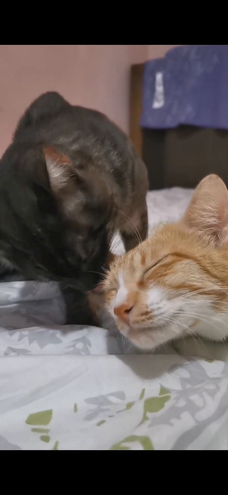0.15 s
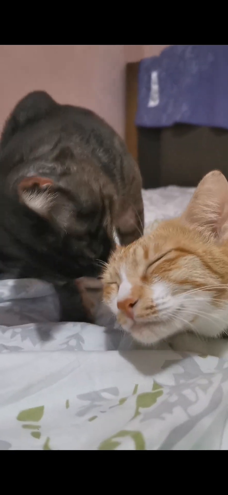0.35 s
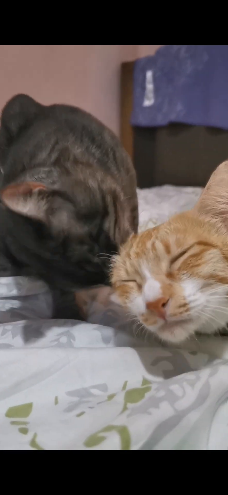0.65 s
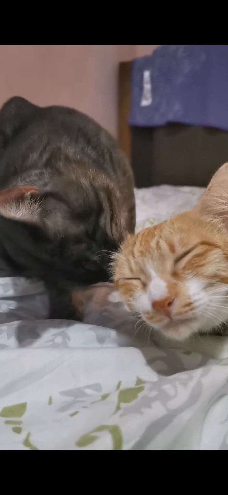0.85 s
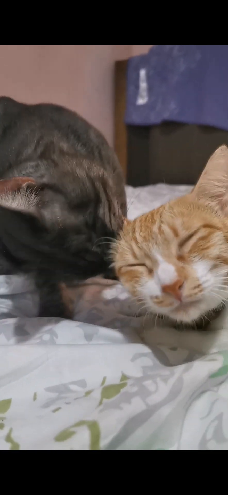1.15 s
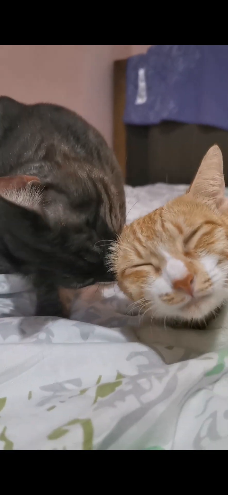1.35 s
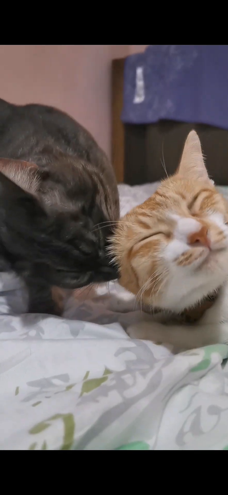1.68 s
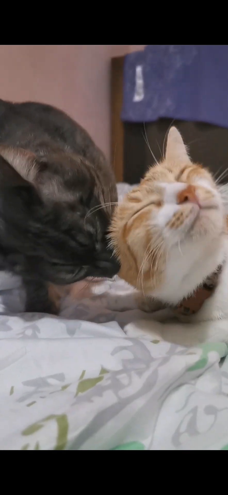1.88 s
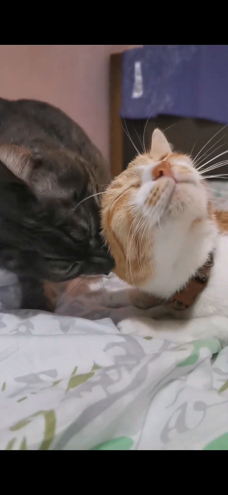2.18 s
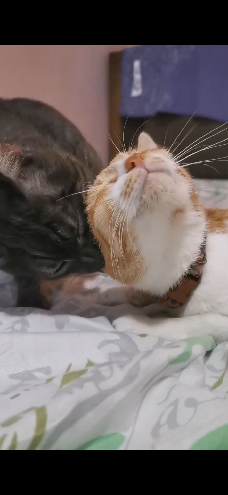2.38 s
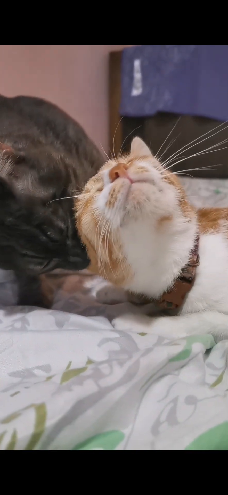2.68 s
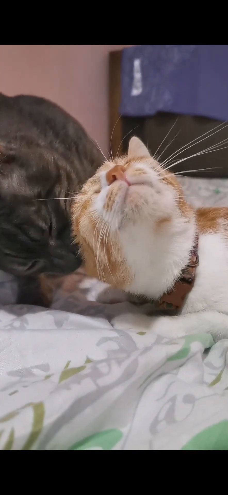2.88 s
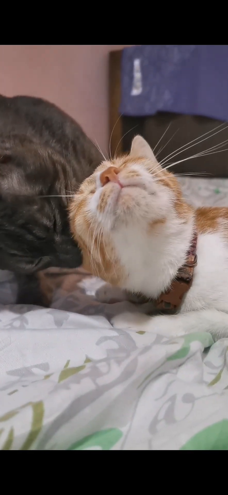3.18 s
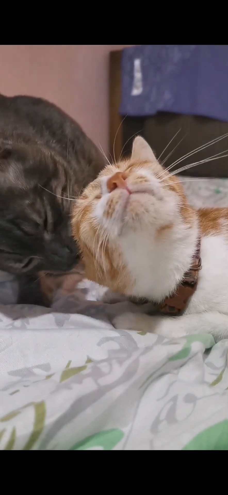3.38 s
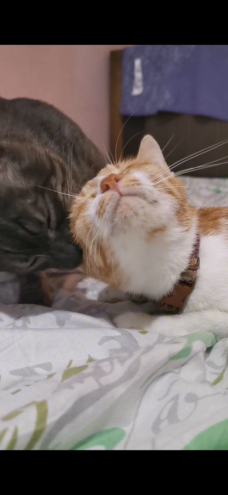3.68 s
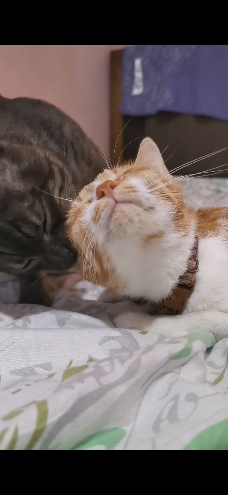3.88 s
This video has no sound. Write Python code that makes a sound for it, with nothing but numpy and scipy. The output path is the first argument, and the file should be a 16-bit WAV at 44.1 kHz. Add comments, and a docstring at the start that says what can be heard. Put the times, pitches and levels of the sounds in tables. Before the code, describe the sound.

Very close contact sound from cats grooming on a bed: light rubs and a soft bump, then three long, harsh rasping strokes with bright hair crackle. Afterwards only tiny prickly ticks and faint rustles fade out. Nearly everything is on the right; the left holds faint rumble and hiss.

```python
"""On a bed with a cat, bedding or fur rubs the right microphone port: rasping strokes, snapping hairs and soft
pushes reach it by contact, loud and dry, made from random catches, noise and damped rings. The almost shut
left port has its own rumble and hiss, a trace of airborne rasp, a faint two-partial mew, a short noise snort
and a tap on the case."""
import sys
import numpy as np
from scipy import signal
from scipy.fft import rfft, irfft
from scipy.io import wavfile
from scipy.ndimage import uniform_filter1d, map_coordinates

SR = 44100
rng = np.random.default_rng(int(sys.argv[2]) if len(sys.argv) > 2 else 0)


def store_pcm(level_fs):
    """Save levels as 16-bit WAV."""
    pcm = np.round(np.clip(level_fs, -1, 1) * 32767).astype(np.int16)
    wavfile.write(sys.argv[1], SR, np.atleast_2d(pcm).T)


def elevation(decibels):
    """Turn decibel levels (scalar or array-like) into linear amplitude ratios."""
    levels = np.asarray(decibels, float)
    return 10 ** (levels / 20)


N = 177754

# Colours of a stroke: (frequency [Hz], relative density [dB per Hz])
# Mid rasp of the rubbing
RASP_COLOUR = [(600, -26.5), (1000, -3.5), (1500, 0), (1850, -1), (2250, 2), (2800, -1), (3400, -5.5),
               (4200, -28), (6000, -17.5)]
# Bright sizzle of hairs
SIZZLE_COLOUR = [(2500, -20), (3600, -5), (5200, 2.34), (7500, -8.5), (11000, -9), (16000, -13)]
# Harsh scrape at full contact
SCRAPE_COLOUR = [(2600, -26.5), (3500, -2.5), (4500, 5), (6000, -1), (7500, -23)]
# Dull pressure on the port
PRESS_COLOUR = [(130, -8), (250, -1), (420, 1.5), (700, 2), (1000, -3), (1700, -9.5), (2700, -16),
                (4000, -48)]
# Low push against the port
PUSH_COLOUR = [(20, -39), (45, -5), (110, 4), (200, 1), (400, -8.5)]


def strokes(rasp_db, sizzle_db, press_db, push_db):
    """Rubbing catches drive four ranges and plain noise the low push; one shared stutter breaks up the stroke."""
    fine = catches(rasp_db, slow_rate=500.0, per_db=2.16, spread_db=3.0, smooth=0.5)
    coarse = catches(rasp_db, slow_rate=250.0, per_db=0.27, spread_db=-0.5, smooth=0.74)
    mixed = 0.93 * fine + 0.51 * coarse

    sizzle_gain = elevation(sizzle_db - 2.5 + 0.37 * wobble(39.73))
    sizzle = sizzle_gain * patchy(coloured(fine, SIZZLE_COLOUR), depth_db=1.0)
    rasp = elevation(rasp_db + 0.47) * patchy(coloured(mixed, RASP_COLOUR), depth_db=0.66)
    press_gain = elevation(press_db - 0.33 + 0.3 * wobble(30.53))
    press = press_gain * patchy(coloured(coarse, PRESS_COLOUR), depth_db=1.0)
    push_gain = elevation(push_db - 0.5 + 1.35 * wobble(28.91))
    push = push_gain * coloured(noise(), PUSH_COLOUR)

    # Scrape grows faster than the rasp: 1.33 dB per dB, from its level in a full stroke
    full_stroke_db, scrape_db, scrape_growth = -33, -42, 1.33
    scrape_gain = elevation(scrape_db + scrape_growth * (rasp_db - full_stroke_db))
    scrape = scrape_gain * patchy(coloured(fine, SCRAPE_COLOUR), depth_db=4.5)

    stutter_db = 0.37 * wobble(45.4) + 0.87 * wobble(120)
    return elevation(stutter_db) * (scrape + sizzle + rasp + press + push)


def catches(effort_db, slow_rate, per_db, spread_db, smooth):
    """Rubbing surfaces catch and let go as random clicks whose rate follows effort, over smooth sliding noise."""
    light_touch_db = -59.5  # here the base rate is slow_rate [catches/s]
    chance = slow_rate * elevation(per_db * (effort_db - light_touch_db)) / SR
    chance = np.clip(chance, 1e-4, 1)
    caught = rng.random(N) < chance * elevation(5 * wobble(60))
    size_db = spread_db * np.minimum(rng.exponential(size=N), 5)
    direction = np.sign(rng.random(N) - 0.4)  # more pull than push
    sizes = elevation(size_db) * direction
    # Level stays even as the catches get denser
    clicks = caught * sizes / np.sqrt(chance * np.mean(sizes ** 2))
    return np.sqrt(1 - smooth) * clicks + np.sqrt(smooth) * noise()


# Three long rasping strokes, a curve each: (time [s], relative rasp level [dB], sizzle over rasp [dB])
STROKE_CURVES = [
    [(.72, -62, 8), (.775, -47.5, -1.2), (.83, -41, -0.3), (.9, -33, -1), (1.04, -33.5, 0.7),
     (1.17, -33, -1), (1.2, -37, -1), (1.26, -62, 6.5)],
    [(1.36, -63, 2), (1.445, -31, -2.5), (1.514, -30, 0.5), (1.575, -35.5, 5.5), (1.67, -36, 1.7),
     (1.715, -57.5, 5)],
    [(1.82, -57.5, 1.5), (1.887, -36.5, 2.8), (1.95, -33.5, 1.5), (2.06, -33.5, 2.3), (2.23, -36.5, 3.5),
     (2.31, -33.5, 2.1), (2.38, -38.5, 4.5), (2.45, -42, 1), (2.49, -75.5, 11)],
]
# Short light rubs: (peak time [s], width [s], relative rasp level [dB], sizzle over rasp [dB])
LIGHT_RUBS = [(.275, 0.044, -49, -3), (0.376, 0.13, -50.5, -3.5), (0.479, 0.15, -51, -0.5),
              (.625, 0.066, -52.5, -2), (.73, 0.067, -58, 1), (1.295, 0.07, -54.5, 0.7),
              (1.792, .08, -56, -4), (2.68, 0.21, -61, -0.5), (2.806, 0.088, -58, -4),
              (2.97, 0.046, -64, -1), (3.078, 0.077, -62.5, -3), (3.418, 0.041, -70, -5),
              (3.48, .07, -70, 3), (3.555, .08, -67.5, 12), (3.622, 0.051, -60, -4), (3.713, 0.049, -61, 8),
              (3.809, 0.03, -69, 11.5), (3.945, 0.075, -71, -9)]
# Bedding or fur resting on the port, shifting a little:
# (time [s], relative rasp level [dB], sizzle over rasp [dB], pressure over rasp [dB])
RESTING_CONTACT = [(0, -77, -13, 9.5), (.13, -77.5, -3, 12), (.17, -72.5, 1, 10.5), (.21, -60, 2.5, 1),
                   (.33, -55.5, -2.5, 4.5), (.57, -58.5, -3, 1.5), (.69, -60, 4.5, -10),
                   (1.35, -61, 0.5, -5.5), (1.75, -59.5, 4.5, 1.5), (2.49, -64, 3, -7),
                   (2.9, -64.5, 0.7, -9), (3.29, -68, -3, -8), (3.36, -69.5, 3.5, -3), (3.6, -65.5, 3, -11),
                   (4.03, -70, 3, -4)]
# Pressure on the port surges:
# (peak time [s], width [s], relative pressure level [dB], relative push level [dB])
PRESS_SURGES = [(0.211, 0.037, -51, -39.5), (.235, 0.029, -47, -58), (0.271, 0.051, -38, -61),
                (.374, 0.044, -51.5, -53.5), (.55, 0.047, -71, -65), (.79, 0.032, -44, -60),
                (.932, 0.21, -43.5, -46), (1.16, 0.026, -32.5, -37), (1.47, 0.074, -50, -46),
                (1.53, 0.12, -32.5, -42), (1.995, 0.026, -35, -37), (2.303, 0.03, -37, -38),
                (2.378, 0.023, -35, -46)]


def touch():
    """Contact as rasp, sizzle, pressure and push levels: strokes, rubs and surges over the resting contact."""
    stroke_press_db, stroke_push_db, rest_push_db, rub_press_db = -2.5, -12, -6.5, -7  # over the rasp

    long_strokes = []
    for curve in STROKE_CURVES:
        silent_before = (curve[0][0] - 0.01, -140, 0)
        silent_after = (curve[-1][0] + 0.01, -140, 0)
        long_strokes.append(curves([silent_before, *curve, silent_after]))
    rubs = [(bump(s, width_s, db), over_db) for s, width_s, db, over_db in LIGHT_RUBS]
    rest_db, rest_sizzle_db, rest_press_db = curves(RESTING_CONTACT)
    surge_press = [bump(s, width_s, press_db) for s, width_s, press_db, _ in PRESS_SURGES]
    surge_push = [bump(s, width_s, push_db) for s, width_s, _, push_db in PRESS_SURGES]

    stroke_db = summed(db for db, _ in long_strokes)
    rub_db = summed(db for db, _ in rubs)
    rasp_db = summed([stroke_db, rub_db, rest_db])
    moving_sizzle = [db + over_db for db, over_db in long_strokes + rubs]
    sizzle_db = summed(moving_sizzle + [rest_db + rest_sizzle_db])
    steady_press = [stroke_db + stroke_press_db, rub_db + rub_press_db, rest_db + rest_press_db]
    press_db = summed(steady_press + surge_press)
    push_db = summed([stroke_db + stroke_push_db, rest_db + rest_push_db] + surge_push)
    return rasp_db, sizzle_db, press_db, push_db


# The clearest hairs snapping free, soft knocks and smacks:
# (time [s], relative peak level [dB], pitch [Hz], life [cycles])
CLEAR_SNAPS = [(0.201, -56, 152, 1.3), (0.2098, -30.5, 11400, 2.7), (0.2105, -23, 4060, 0.47),
               (0.2118, -28, 165, 0.39), (0.323, -33, 7000, 1.2), (0.3405, -40, 8000, 1.1),
               (0.37, -28.5, 2020, 0.91), (0.41, -27, 2130, 0.88), (0.47, -31, 2800, 1.2),
               (0.541, -32, 3180, 0.89), (0.6179, -32, 3590, 1.6), (0.8367, -31, 3100, 0.51),
               (0.448, -25.5, 5600, 0.41), (0.4864, -33, 3060, 0.83), (0.5118, -22.5, 7900, 0.47),
               (0.531, -29.5, 7950, 1.1), (0.6267, -28, 5700, 0.76), (0.64, -27, 3100, 1.04),
               (0.7226, -31.5, 4000, 0.95), (0.7705, -22, 3670, 0.46), (0.7751, -23, 2800, 0.4),
               (1.24, -21, 4100, 0.34), (1.2794, -32, 4800, 0.83), (1.6837, -14, 2760, 0.25),
               (1.6878, -19.5, 4900, 1.6), (1.755, -39, 6600, 1.1), (1.8268, -27, 5700, 2.1),
               (2.4705, -31, 5060, 2.4), (1.3733, -30.5, 10300, 2), (1.7374, -21.5, 5070, 2.6),
               (1.7435, -22, 4620, 2.1), (1.784, -37, 1230, 4.4), (1.792, -30, 4730, 2.5),
               (1.8042, -28, 5800, 0.57), (1.8123, -28, 5100, 1.8), (1.819, -21, 5860, 0.47),
               (2.4965, -28, 2660, 0.24), (2.5603, -34, 5400, 2.8), (2.5647, -34, 5600, 1.2),
               (2.67, -32, 5700, 3.1), (2.6973, -29, 5900, 2.8), (2.785, -30, 5630, 2.1),
               (2.792, -28.5, 2200, 0.82), (2.804, -26, 4020, 1), (2.8124, -20, 5500, 2.7),
               (2.8354, -27.5, 6650, 1.7), (2.8507, -29, 5800, 1.3), (2.853, -33.5, 1660, 0.73),
               (2.9093, -37.5, 5460, 1.9), (2.975, -31.5, 5730, 0.92), (2.9857, -35, 5300, 1.6),
               (3.0256, -33.5, 3860, 0.73), (3.0853, -39, 2390, 1.2), (3.1676, -34.5, 8500, 0.53),
               (3.2185, -32.5, 4350, 0.49), (3.2366, -37.5, 7400, 0.73), (3.2951, -37, 6800, 3.7),
               (3.3131, -33, 5100, 1.2), (3.3448, -40, 1980, 1.2), (3.4027, -35, 6300, 2),
               (3.41, -34, 7140, 0.9), (3.4387, -26.5, 5200, 1.8), (3.5328, -29, 9050, 0.85),
               (3.624, -51, 347, 1.3), (3.6286, -35.5, 9200, 1.2), (3.6607, -27.5, 6060, 1.2),
               (3.6883, -37, 7800, 1.4), (3.7073, -35, 5200, 1.5), (3.711, -31, 8000, 1.1),
               (3.7227, -31, 5260, 0.61), (3.799, -33.5, 6150, 1.4), (3.8521, -40, 6140, 1.7),
               (3.878, -40.5, 8950, 1.6), (3.9645, -40, 4450, 0.92), (3.9858, -41, 5800, 1.5)]


def snaps(sizzle_db):
    """Each hair lets go abruptly and rings a few damped cycles; lesser ones prickle around the clear ones."""
    lesser = rng.random((480, 4))
    lesser_s = lesser[:, 0] * (N - 1) / SR
    local_db = np.minimum(sizzle_db[(lesser_s * SR).astype(int)], -36)
    lesser_db = local_db + 5.5 + 13 * lesser[:, 1] ** 2
    lesser_hz = 2200 * 7.2 ** lesser[:, 2]
    lesser_cycles = 0.62 + 0.79 * lesser[:, 3]
    rows = np.vstack([np.transpose([lesser_s, lesser_db, lesser_hz, lesser_cycles]), CLEAR_SNAPS])

    length = 1200
    out, t = np.zeros(N + length), np.arange(length) / SR
    for s, db, hz, cycles in rows:
        turn, sign = rng.random(2)
        onset = 1 - np.exp(-t * hz / 0.46)
        decay = np.exp(-1.6 * t * hz / max(cycles, 0.3))
        ring = onset * decay * np.sin(2 * np.pi * hz * t + 1.32 * turn) * np.sign(sign - 0.5)
        ring[75:] += 0.081 * ring[:-75]  # rebound
        start = round(s * SR)
        out[start:start + length] += elevation(db - 3.5) * ring / np.abs(ring).max()
    return out[:N]


# Soft dull brushes of fur: (peak time [s], width [s], relative level [dB])
BRUSH_SWELLS = [(2.67, 0.13, -61.5), (2.79, 0.13, -60.5), (3.06, 0.13, -59)]
# Their colour: (frequency [Hz], relative density [dB per Hz])
BRUSH_COLOUR = [(300, -35), (480, -6.5), (650, -1.5), (850, -8), (1300, -10.5), (2000, -14)]


def brushes():
    """Soft fur sweeps by: dull noise in a lumpy swell."""
    level_db = summed(bump(*row) for row in BRUSH_SWELLS) + 1.5 * wobble(60)
    return elevation(level_db) * patchy(coloured(noise(), BRUSH_COLOUR), depth_db=2.0)


# Hair tips rustling on the port: (peak time [s], width [s], relative level [dB])
RUSTLE_SWELLS = [(.45, 0.38, -59), (3.44, .08, -80), (3.6, 0.47, -61.5), (3.95, 0.19, -71.5)]
# Their colour: (frequency [Hz], relative density [dB per Hz])
RUSTLE_COLOUR = [(4500, -20), (6500, 4.5), (10000, -2.5), (16000, -4)]


def rustles():
    """Hair tips whisk lightly: many small catches make a thin, prickly hiss."""
    level_db = summed(bump(*row) for row in RUSTLE_SWELLS)
    tips = catches(level_db, slow_rate=600.0, per_db=-0.1, spread_db=4.0, smooth=0.27)
    return elevation(level_db + 1.2 * wobble(40)) * coloured(tips, RUSTLE_COLOUR)


# Response of the right port's cavity: (frequency [Hz], relative gain [dB])
PORT_RESPONSE = [(20, -3.5), (5500, -1), (6350, -1.5), (6800, 2), (7200, -0.5), (7700, -2.5), (8300, -1),
                 (9800, 1.5), (10700, 5.5), (11200, 4), (12000, -1.5), (13200, -1), (14100, -10),
                 (15000, -1.5), (16000, -4)]


def right_port():
    """Rubbing drives the port directly; its cavity colours the contact sound, over the port's own floor."""
    rasp_db, sizzle_db, press_db, push_db = touch()
    contact = strokes(rasp_db, sizzle_db, press_db, push_db) + snaps(sizzle_db) + brushes() + rustles()
    through_cavity = np.std(contact) * coloured(contact, PORT_RESPONSE)
    return elevation(6) * (through_cavity + right_floor())


# The strokes heard through the air: (peak time [s], width [s], level [dB])
AIR_SWELLS = [(.99, 0.3, -73.5), (1.53, .2, -76), (2.05, 0.38, -75), (2.32, .14, -83)]
# Their colour: (frequency [Hz], relative density [dB per Hz])
AIR_COLOUR = [(1500, -35), (2300, -8), (3000, 0), (4000, -3), (5200, -6), (6500, -11), (7600, -13),
              (9000, -6), (10200, -22), (13000, -32)]


def airborne_rasp():
    """A trace of the strokes crosses the air: faint noise in slow swells."""
    level_db = summed(bump(*row) for row in AIR_SWELLS) + 1.8 * wobble(14.6)
    return elevation(level_db) * patchy(coloured(noise(), AIR_COLOUR), depth_db=1.0)


# Glide of the mew: (time [s], pitch [Hz])
MEW_PITCH = [(.43, 765), (.54, 686), (.62, 700), (.7, 705)]
# Its swell: (peak time [s], width [s])
MEW_SWELL_SHAPE = [(.58, .2)]


def mew():
    """A thin far mew: two clean harmonic partials glide under one swell."""
    first_db, second_db = -78.5, -74  # rms at the swell's peak, before its wobble
    hz, = curves(MEW_PITCH)
    phase = 2 * np.pi * np.cumsum(hz * (1 + 0.0021 * wobble(66))) / SR
    swell = elevation(bump(*MEW_SWELL_SHAPE[0], 0) + 1.5 * wobble(25))
    partials = elevation(first_db) * np.sin(phase) + elevation(second_db) * np.sin(2 * phase)
    return np.sqrt(2) * swell * partials


# Colour of the nose: (frequency [Hz], relative density [dB per Hz])
NOSE_COLOUR = [(800, -28), (1250, -10), (1700, -5), (2400, -11), (3800, -4), (5100, 0), (6500, -2),
               (8300, -3), (9500, -25)]


def snort():
    """A short puff of noise through a cat's nose: it builds, then stops short."""
    peak_s, peak_db = 1.805, -59
    rise, fall = 560, 1298  # dB per second
    t = np.arange(N) / SR - peak_s
    level_db = peak_db + np.minimum(rise * t, -fall * t)
    return elevation(level_db + 2.5 * wobble(300)) * coloured(noise(), NOSE_COLOUR)


# A tap on the case, at the left port: (time [s], relative level [dB])
CASE_TAPS = [(0.207, -66)]


def case_tap():
    """A tap makes the case thud: noise and a 300 Hz tone, dying 60 dB in 30 ms."""
    length = 1500
    out, t = np.zeros(N), np.arange(length) / SR
    for s, db in CASE_TAPS:
        thud = 0.6 * rng.standard_normal(length) + 2.2 * np.sin(2 * np.pi * 300 * t)
        start = round(s * SR)
        out[start:start + length] += elevation(db - 60 * t / 0.03) * thud
    return out


# Rumble and hiss of the left port: (frequency [Hz], relative density [dB per Hz])
LEFT_FLOOR_COLOUR = [(20, 3), (150, 0), (300, -9.5), (600, -16), (1600, -17), (4000, -18), (6800, -27),
                     (7600, -33), (9000, -28), (10200, -32), (15000, -35), (15800, -42)]


def left_floor():
    """The left port's rumble and hiss: coloured noise with a wandering level."""
    return elevation(-74.0 + 0.59 * wobble(16)) * patchy(coloured(noise(), LEFT_FLOOR_COLOUR), depth_db=2.0)


# Rumble and hiss of the right port: (frequency [Hz], relative density [dB per Hz])
RIGHT_FLOOR_COLOUR = [(20, 3.5), (60, -6), (110, -0.5), (170, -24), (450, -27), (1000, -26), (3000, -26.5),
                      (8000, -25.5), (16000, -29)]


def right_floor():
    """The right port's rumble and hiss: coloured noise with a slowly wandering level."""
    return elevation(-68.0 + 1.1 * wobble(3.4)) * coloured(noise(), RIGHT_FLOOR_COLOUR)


def noise():
    """White noise of rms 1."""
    return rng.standard_normal(N)


def unit(x):
    """Scaled to rms 1."""
    return x / np.sqrt(np.mean(x ** 2) + 1e-20)


def curves(rows):
    """One value per sample for each column after the time."""
    s, *columns = np.transpose(rows)
    return [np.interp(np.arange(N) / SR, s, column) for column in columns]


def wobble(rate):
    """A smooth random curve, rate knots a second."""
    knots = rng.standard_normal(int(N * rate / SR) + 4)
    return map_coordinates(knots, [np.arange(N) * rate / SR])


def bump(s, width_s, db):
    """A swell in dB around s, 6 dB down at the edges of its width."""
    return db - 6 * ((np.arange(N) / SR - s) / (width_s / 2)) ** 2


def summed(levels_db):
    """Levels that add in power, in dB."""
    power = sum(elevation(db) ** 2 for db in levels_db)
    return 20 * np.log10(np.sqrt(power) + 1e-9)


def coloured(x, spectrum):
    """x through a causal minimum-phase filter of (Hz, dB) points, rms 1."""
    size = 4096
    f, db = np.transpose(spectrum)
    hz = np.fft.rfftfreq(size, 1 / SR)
    gain_db = np.interp(np.log(hz + 1), np.log(f + 1), db, left=-60, right=-60)
    cepstrum = irfft(np.log(elevation(gain_db)))
    # Folding the cepstrum forward puts the energy as early as possible
    cepstrum[1:size // 2] *= 2
    cepstrum[size // 2 + 1:] = 0
    impulse = irfft(np.exp(rfft(cepstrum)))
    return unit(signal.fftconvolve(x, impulse)[:N])


def patchy(x, depth_db):
    """The colour drifts in patches a few hundred Hz wide and some tens of ms long, rms 1."""
    z = signal.stft(x, nperseg=512)[2]
    field = uniform_filter1d(rng.standard_normal(z.shape), size=5, axis=0)
    field = uniform_filter1d(field, size=8, axis=1)
    drifting = z * elevation(depth_db * unit(field))
    return unit(signal.istft(drifting, nperseg=512)[1][:N])


def scene():
    """The quiet port on the left, the contact sound on the right."""
    left = left_floor() + airborne_rasp() + mew() + snort() + case_tap()
    return np.array([left, right_port()])


def top_cut(x):
    """Nothing passes above the cut-off."""
    return signal.sosfilt(signal.butter(12, 16550, fs=SR, output="sos"), x)


def record(dry):
    """A band limit at 15760 Hz, then a slight constant offset on each channel."""
    spectrum = rfft(dry, axis=1) * (np.fft.rfftfreq(N, 1 / SR) < 15760)
    offset = [[-0.00012], [-0.0002]]  # left, right
    mix = irfft(spectrum, N, axis=1) + offset
    return top_cut(mix)


dry = scene()
out = record(dry)
store_pcm(out)
```